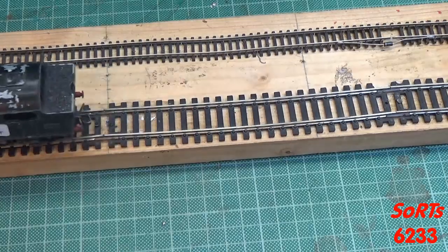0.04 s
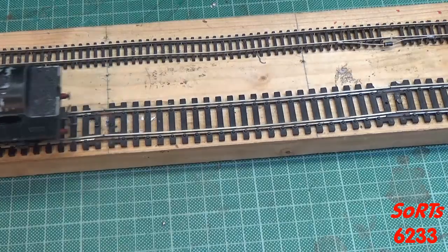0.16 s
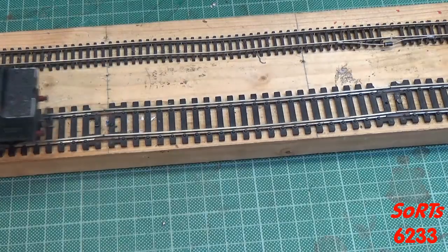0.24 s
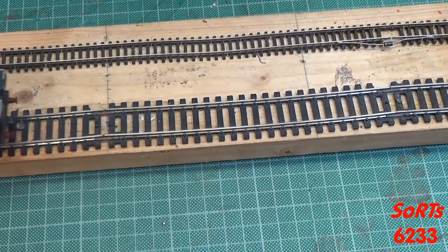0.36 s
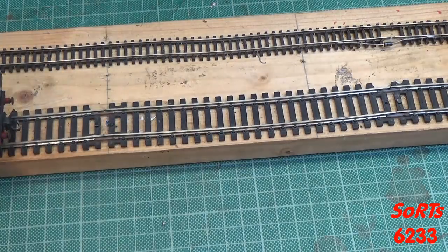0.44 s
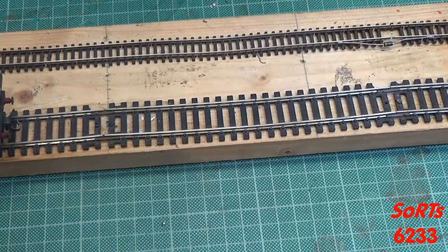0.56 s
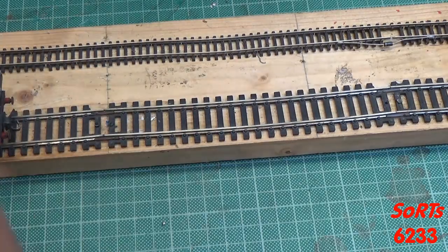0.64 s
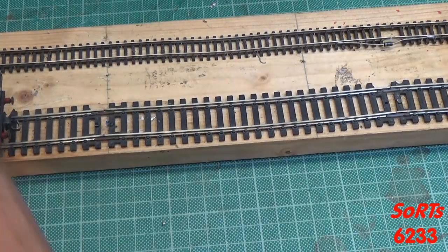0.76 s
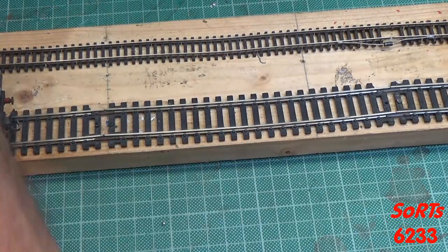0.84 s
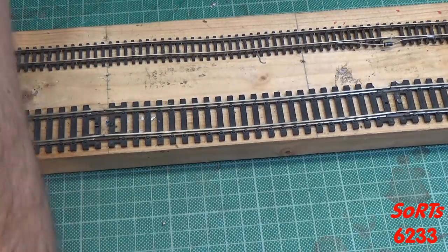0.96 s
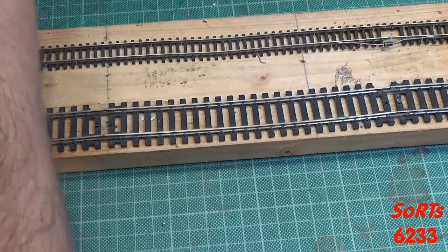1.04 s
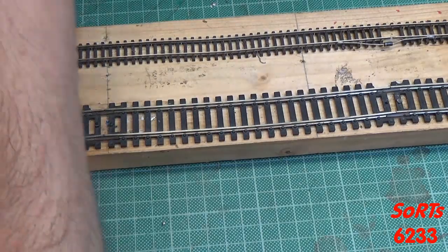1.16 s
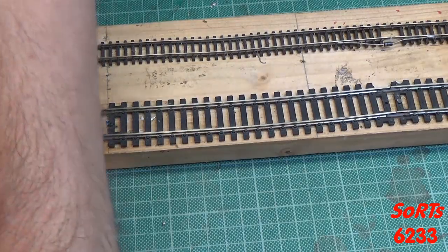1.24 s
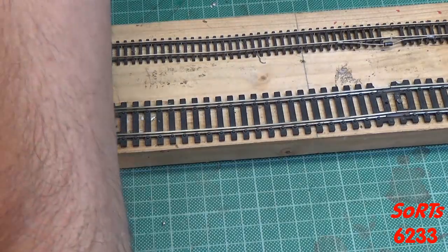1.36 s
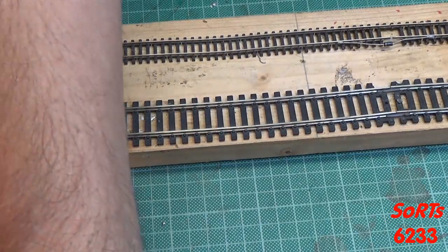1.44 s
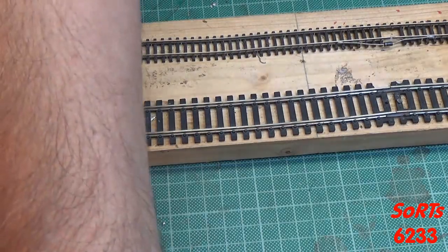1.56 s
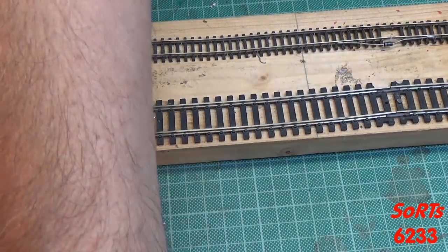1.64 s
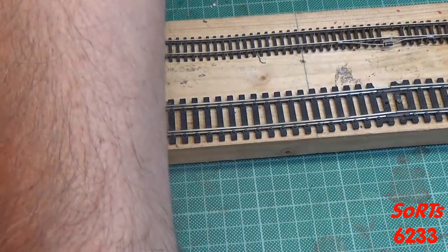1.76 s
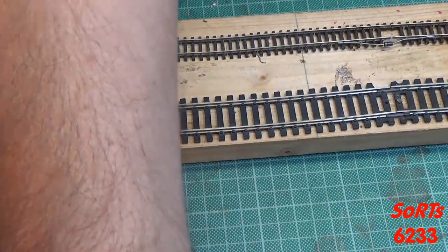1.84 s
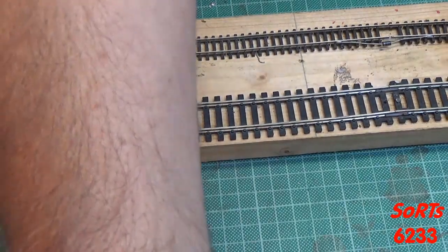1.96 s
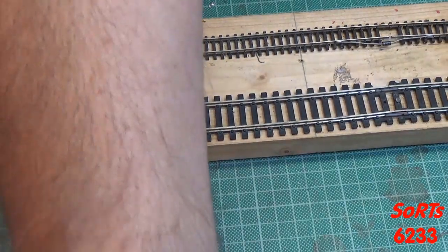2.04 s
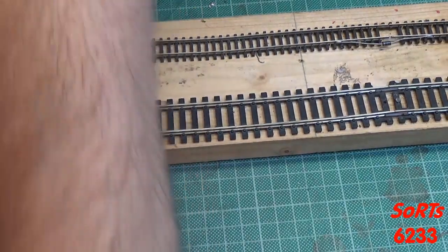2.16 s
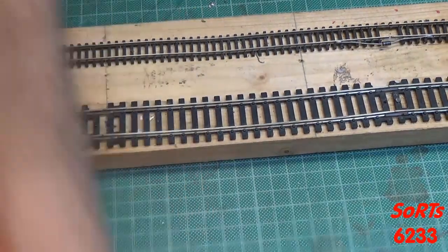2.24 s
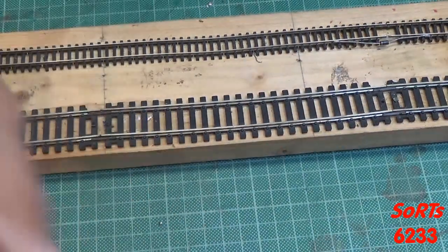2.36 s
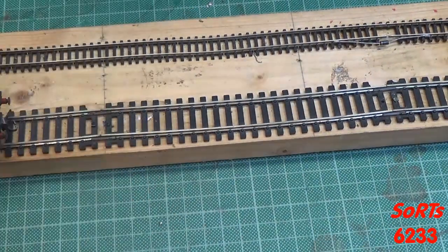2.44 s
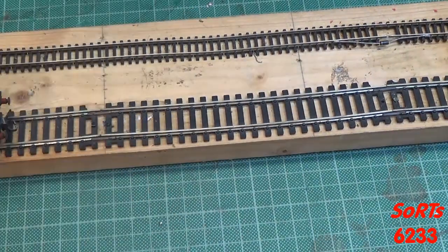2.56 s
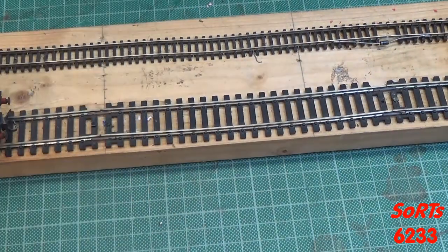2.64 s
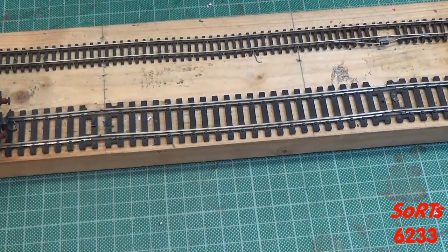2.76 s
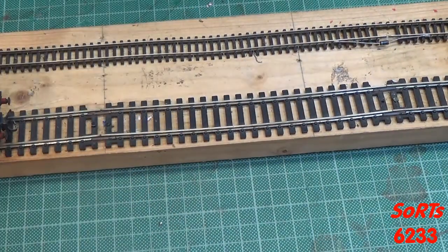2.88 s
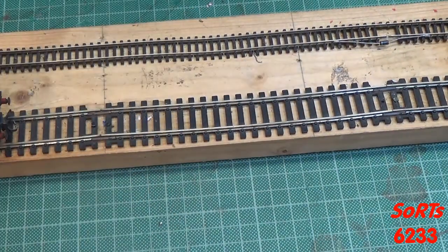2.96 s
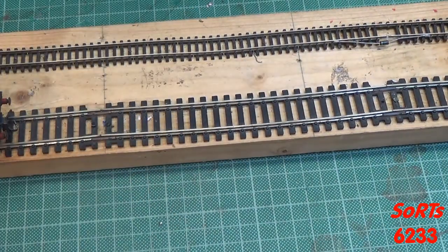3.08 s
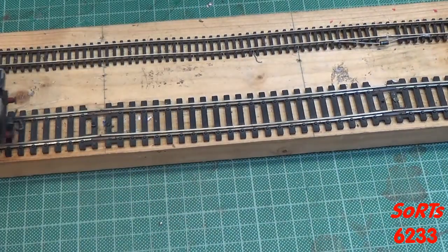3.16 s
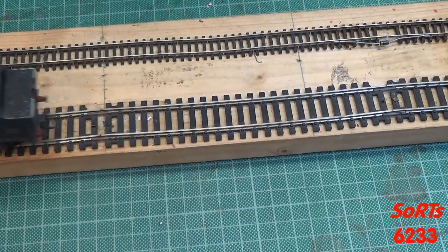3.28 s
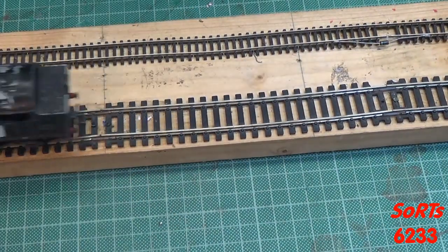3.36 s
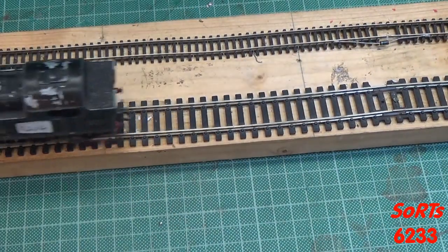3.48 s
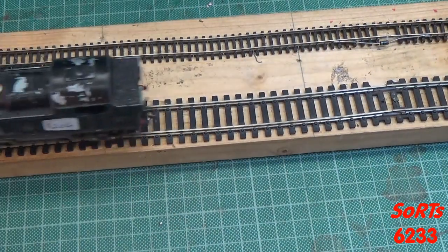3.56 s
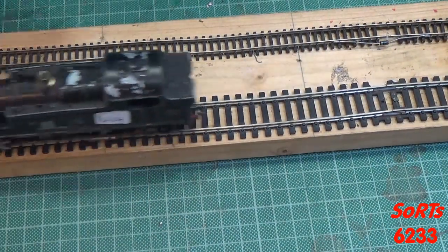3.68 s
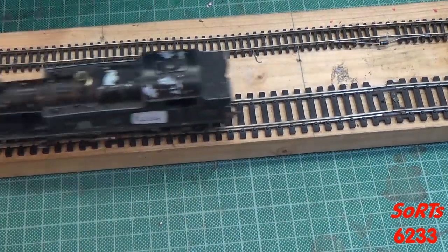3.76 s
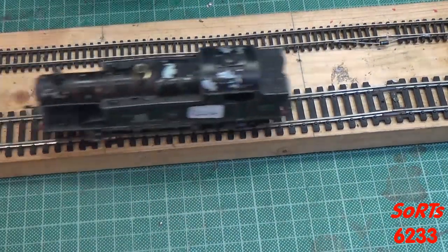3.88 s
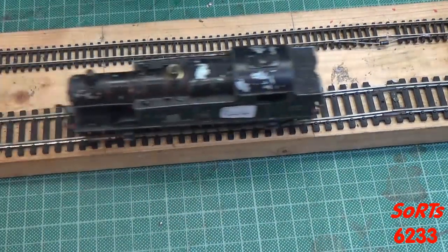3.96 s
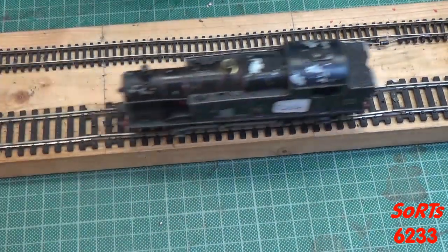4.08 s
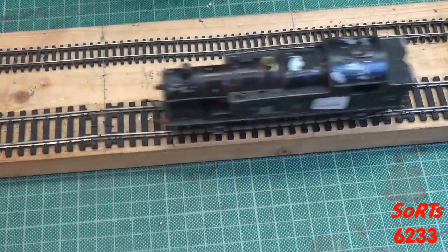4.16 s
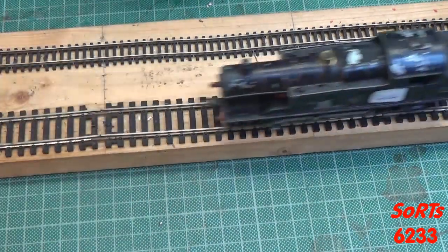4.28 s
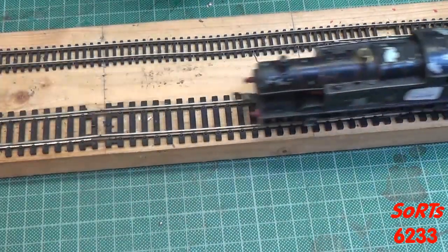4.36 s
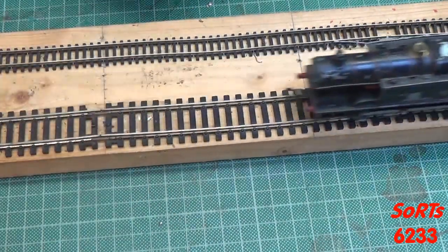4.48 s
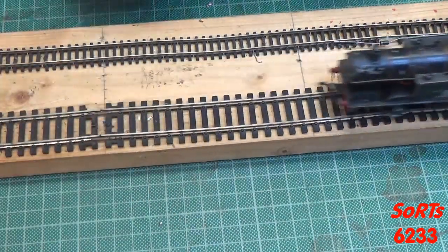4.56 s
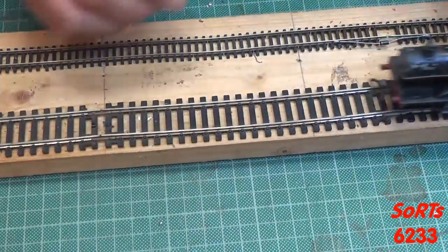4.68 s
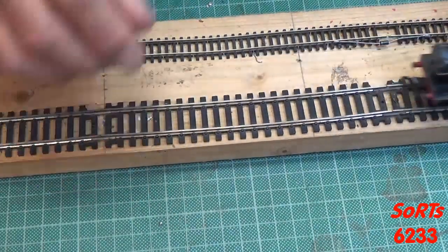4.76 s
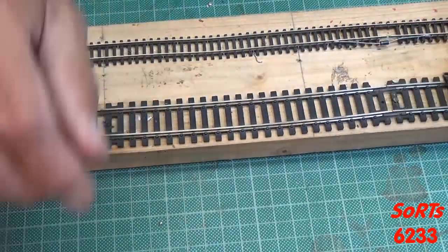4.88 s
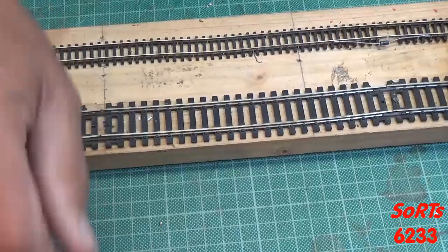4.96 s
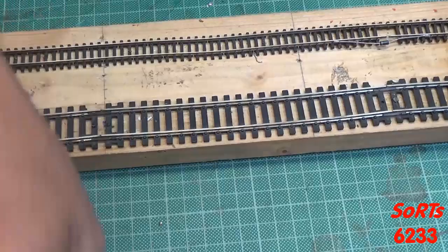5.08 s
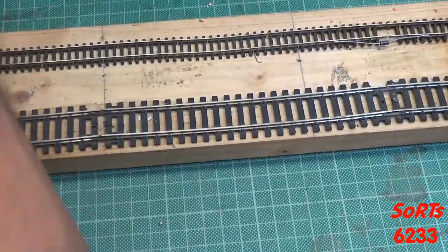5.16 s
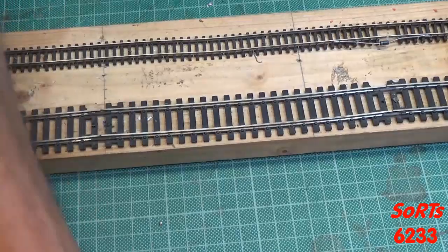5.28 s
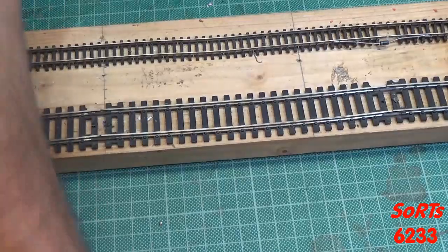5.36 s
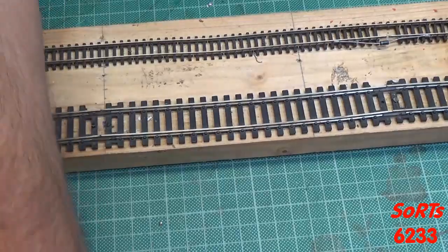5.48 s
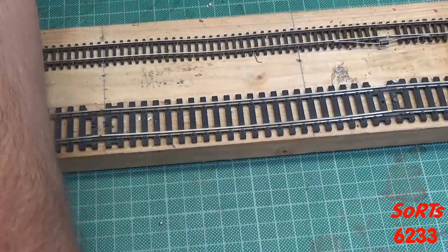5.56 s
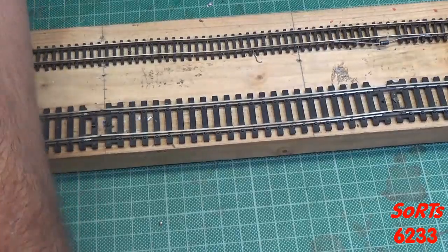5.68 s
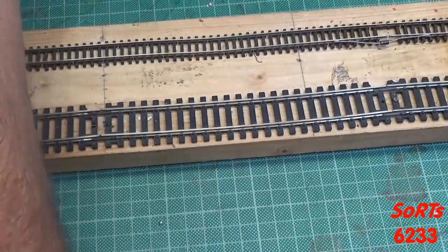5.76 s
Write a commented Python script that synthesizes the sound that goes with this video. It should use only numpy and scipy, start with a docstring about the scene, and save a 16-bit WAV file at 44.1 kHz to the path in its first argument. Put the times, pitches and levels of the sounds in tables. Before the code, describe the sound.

Soft bench knocks and clicks, then a toy locomotive's gritty gear whir with a thin whine, a pause with scraping bumps, and a short second run.

```python
"""In a small room, a model tank locomotive runs out along a wooden plank, stops and runs back near the microphone.
Random gear taps and loose metal excite the resonant body shell; shaped noise makes plank boom and wheel roll.
Wandering sine tones make the chassis sing and the gear mesh whine on the way out.
Noise bursts and damped modes make a direction switch before each run, and knocks and bumps on the bench.
Something scrapes on the bench, a faint high buzz pulses behind, and a falling band of noise swishes at the end."""
import sys
import numpy as np
from scipy import signal
from scipy.fft import rfft, irfft
from scipy.io import wavfile

SR = 44100
rng = np.random.default_rng(int(sys.argv[2]) if len(sys.argv) > 2 else 0)


def unload_wav(signal):
    """Save mono or channel-first audio to the path in sys.argv[1] as 16-bit WAV at rate SR, clipped to [-1, 1]."""
    wavfile.write(
        sys.argv[1],
        SR,
        np.round(np.clip(np.atleast_2d(signal).T, -1, 1) * 32767).astype(np.int16),
    )


N = 257103
T = np.arange(N) / SR
FREQ = np.maximum(np.fft.rfftfreq(2 * N, 1 / SR), 1)


def undb(db):
    """Decibels to gain."""
    return 10 ** (np.asarray(db) / 20)


def unit(x):
    """Scale to rms 1."""
    return x / np.sqrt(np.mean(x ** 2))


def curves(rows):
    """Each column of a timed table, interpolated per sample."""
    t_s, *columns = np.transpose(rows)
    return [np.interp(T, t_s, column) for column in columns]


def spectrum(points):
    """Level in dB at every frequency, straight lines on a log axis."""
    hz, db = np.transpose(points)
    return np.interp(np.log(FREQ), np.log(hz), db)


def colour(x, db):
    """Minimum-phase filter of the given dB shape and unit power gain: it rings after a blow, never before."""
    cepstrum = irfft(np.log(unit(undb(db))))
    cepstrum[1:N] *= 2
    cepstrum[N + 1:] = 0
    response = np.exp(rfft(cepstrum))
    return irfft(rfft(x, 2 * N) * response)[..., :N]


def noise():
    """White noise."""
    return rng.standard_normal(N)


def walk(cutoff_hz):
    """Smooth random motion of rms 1: low-passed noise."""
    lowpass = signal.butter(2, cutoff_hz, fs=SR, output="sos")
    return unit(signal.sosfilt(lowpass, noise()))


def band(x, hz, q):
    """One resonance, scaled to rms 1."""
    b, a = signal.iirpeak(min(hz, SR / 2 - 1), q, fs=SR)
    return unit(signal.lfilter(b, a, x))


def tone(hz, wander_hz, rate_hz):
    """Thin tone of rms 1 whose pitch wanders."""
    cycles = np.cumsum(hz + wander_hz * walk(rate_hz)) / SR
    return np.sqrt(2) * np.sin(2 * np.pi * cycles)


def swell(peak_s, rise_db_per_s, fall_db_per_s, hold_s=0):
    """Gain that rises to 1, holds and falls, straight in dB."""
    rise_db = rise_db_per_s * np.maximum(peak_s - T, 0)
    fall_db = fall_db_per_s * np.maximum(T - peak_s - hold_s, 0)
    return undb(-rise_db - fall_db)


def burst(start_s, db, contact_s):
    """Force of one rough contact: noise that builds quickly and dies away."""
    age = np.maximum(T - start_s, 0) / contact_s
    build = 1 - np.exp(-3 * age ** 2)
    force = noise() * build * np.exp(-np.minimum(age, 50))
    return undb(db) * force * np.sqrt(contact_s * SR / np.sum(force ** 2))


def ring(modes, blows, push_s):
    """Damped modes set off by (t/s, level/dB) blows; the push takes a moment to build."""
    out, t = np.zeros(N + SR), T[:SR // 2]
    rung = sum(undb(db - 60 * t / t60_s) * np.sin(2 * np.pi * hz * t) for hz, db, t60_s in modes)
    rung = rung * (1 - np.exp(-(t / push_s) ** 2))
    for start_s, db in blows:
        start = int(start_s * SR)
        out[start:start + len(t)] += undb(db) * rung
    return out[:N]


def scatter(per_s, scatter_db):
    """Touches at random moments, of random strength."""
    strength_db = scatter_db * np.clip(noise(), -2, 2)
    return (rng.random(N) < per_s / SR) * undb(strength_db)


def tinkle(hz, per_s, q, decay_s=0.0026, scatter_db=3):
    """Small loose parts touch at random moments and ring briefly near one pitch."""
    touches = scatter(per_s, scatter_db)
    fading = signal.lfilter([1], [1, -np.exp(-1 / (decay_s * SR))], touches)
    return band(noise() * fading, hz, q)


def room(x, wet_db, t60_s, side):
    """Dense early echoes from bench and walls, partly different at each ear."""
    t = T[:SR // 2]
    fade = undb(-60 * t / t60_s) * (t > .0015)
    fade = fade / np.linalg.norm(fade)
    mid, across = (signal.fftconvolve(x, rng.standard_normal(len(t)) * fade)[:N] for _ in range(2))
    # the microphone pair spreads the low middle most: f/Hz, level/dB
    spread = [(60, -3.0), (170, 6.0), (280, 12.5), (500, 23.0), (1000, 19.5), (3000, 15.5), (12000, 13.0)]
    across = colour(across, spectrum(spread))
    return x + undb(wet_db) * (mid + side * np.array([across, -across]))


# still-room spectrum: f/Hz, level/dB
AIR_COLOUR = [(15, -111), (25, -19), (70, -7.5), (114, -5), (145, -5), (326, -15.5), (405, -8.5), (476, -9),
              (516, -13.5), (734, -10.5), (818, -15), (1290, -12), (1480, -17.5), (2990, -19.5),
              (16000, -36.5)]
# room noise: t/s, level/dB
AIR_LEVEL = [(0, -49.5), (1.3, -50), (1.7, -52), (2.2, -52), (5.5, -46), (5.83, -47.5)]
# room noise, side re mid: f/Hz, level/dB
AIR_WIDTH = [(25, -5), (70, -43), (180, -18), (400, -13), (900, -9.5), (2000, -9), (4500, -8), (9000, -17)]


def air(hum_hz=100, hum_db=-57):
    """Room noise, coloured and spread by frequency, with a faint wavering mains hum."""
    mid, across = colour(np.array([noise(), noise()]), spectrum(AIR_COLOUR))
    across = irfft(rfft(across, 2 * N) * undb(spectrum(AIR_WIDTH)))[:N]
    hum = undb(hum_db + 2.3 * walk(0.34)) * np.sin(2 * np.pi * hum_hz * T)
    level = undb(curves(AIR_LEVEL)[0] + 0.12 * walk(0.53))
    return (mid + np.array([across, -across])) * level + hum


def faint_buzz(hz=3020, pulse_hz=25.2, start_db=-63.5, fade_db_per_s=3, deepest_fade_db=4):
    """A wandering high tone pulses evenly and recedes a little."""
    gate = (.5 + .5 * np.cos(2 * np.pi * pulse_hz * T)) ** 4
    level_db = start_db - np.minimum(fade_db_per_s * T, deepest_fade_db)
    return unit(tone(hz, wander_hz=60, rate_hz=137) * gate) * undb(level_db)


SWISH_S, SWISH_LENGTH_S, SWISH_DB = 5.62, .21, -53.5
SWISH_START_HZ, SWISH_FALL_OCTAVES_PER_S = 6500, 4.3


def swish(width_hz=330, rough_db=2, waver_hz=200):
    """Faint, uneven brushing hiss: narrow noise on a falling, wavering carrier."""
    age_s = np.clip(T - SWISH_S, 0, SWISH_LENGTH_S)
    hz = SWISH_START_HZ * 2 ** (-SWISH_FALL_OCTAVES_PER_S * age_s) + waver_hz * walk(117.5)
    arch = np.sqrt(np.abs(np.sin(np.pi * age_s / SWISH_LENGTH_S)))
    hiss = unit(walk(width_hz) * np.cos(2 * np.pi * np.cumsum(hz) / SR))
    return hiss * arch * undb(SWISH_DB + rough_db * walk(90))


# scrape: f/Hz, level/dB
SCRAPE_COLOUR = [(120, -10), (240, 4.5), (290, -7.5), (340, 2), (410, 7), (490, -4), (580, -7), (800, -13),
                 (1100, -14), (2500, -23), (8000, -37.5)]
SLIDE_PEAK_S, SLIDE_HOLD_S, SLIDE_DB = 4.965, 0.096, -25.5
SLIDE_RISE_DB_PER_S, SLIDE_FALL_DB_PER_S = 226, 430


def slide(side=0.51, grit_hz=1400, grit_db=-11):
    """Short juddering scrape on the bench with catches of grit, spread between the ears."""
    mid, across = colour(np.array([noise(), noise()]), spectrum(SCRAPE_COLOUR))
    grit = undb(grit_db) * tinkle(grit_hz, per_s=220, q=1.5, decay_s=0.00086)
    judder = undb(SLIDE_DB + 2 * walk(54))
    level = judder * swell(SLIDE_PEAK_S, SLIDE_RISE_DB_PER_S, SLIDE_FALL_DB_PER_S, SLIDE_HOLD_S)
    return (mid + grit + side * np.array([across, -across])) * level


# heavy bumps late in the scrape: t/s, level/dB
BUMP_BLOWS = [(5.0085, -8.5), (5.0135, -12), (5.051, -12.5), (5.06, -15)]
# f/Hz, level/dB, t60/s
BUMP_RING = [(395, -17, 0.04), (505, 5.5, 0.031), (636, -4, 0.03), (830, -7.5, 0.036), (1400, -13, 0.02)]


def bumps(left_over_right_db=3):
    """Heavy, hollow bumps on the left: damped modes, spread widely."""
    rung = ring(BUMP_RING, BUMP_BLOWS, push_s=0.0015)
    pan_db = np.array([[left_over_right_db], [-left_over_right_db]]) / 2
    return room(rung, wet_db=-6.0, t60_s=0.059, side=0.87) * undb(pan_db)


# bench-top thumps: t/s, level/dB
THUMP_BLOWS = [(1.351, -32), (1.373, -24), (1.438, -33)]
# f/Hz, level/dB, t60/s
THUMP_RING = [(89, -4.5, 0.17), (152, -5, .06)]


def thumps():
    """The bench top answers with short, deep damped modes."""
    return ring(THUMP_RING, THUMP_BLOWS, push_s=0.003)


# knocks on the bench: t/s, level/dB, contact/s, bench ring re knock/dB, bass edge f/Hz
BENCH_KNOCKS = [(.04, -46, 0.035, -44, 40), (.29, -48.5, 0.051, -43, 40), (0.475, -35, 0.013, -31, 110),
                (0.827, -38.5, 0.014, -17, 110), (1.0165, -28, 0.0061, -11.5, 323),
                (1.312, -36.5, 0.013, -26, 60), (1.3499, -14.5, 0.0023, -13, 50),
                (1.362, -25.5, 0.0044, -9, 60), (1.374, -28, 0.0042, 3.5, 199),
                (1.379, -28, 0.0034, -20, 900), (1.44, -42, 0.013, -30, 40),
                (4.873, -23, 0.004, -10.5, 500), (4.88, -36, .008, -24, 150),
                (4.9195, -26, 0.0032, -12, 130), (5.01, -19, 0.0026, -10, 550),
                (5.023, -23, 0.0031, -24, 300), (5.036, -23, 0.0017, -22, 250),
                (5.045, -24, 0.0023, -9, 704), (5.052, -23, 0.0023, -14, 248),
                (5.061, -33, 0.0024, -24, 400), (5.687, -38.5, 0.018, -39, 170)]
# knock, before dulling and bass loss: f/Hz, level/dB
BENCH_COLOUR = [(40, -22), (80, 4), (170, 7), (280, 5), (430, 0), (750, 0.5), (1500, -3.5), (2300, -10.5),
                (4000, 0), (8000, 0.5), (16000, 0)]
KNOCK_CYCLES = 6.9  # dull above this many cycles per contact time


def knocks():
    """Thuds on the bench: the longer the contact, the duller; each has its own bass edge."""
    out = np.zeros(N)
    for start_s, db, contact_s, _, low_hz in BENCH_KNOCKS:
        dull_db = 10 * np.log10(1 + (FREQ * contact_s / KNOCK_CYCLES) ** 4.9)
        thin_db = 10 * np.log10(1 + (low_hz / FREQ) ** 3)
        out += colour(burst(start_s, db, contact_s), spectrum(BENCH_COLOUR) - dull_db - thin_db)
    return out


# f/Hz, level/dB, t60/s
BENCH_RING = [(700.6, 9.5, 0.18), (757, 3.5, 0.097), (1230, -10, 0.08)]


def bench_ring(left_lag_s=0.00044):
    """The knocks leave a hollow ring, which reaches the right side first."""
    blows = [(start_s, db + ring_db) for start_s, db, _, ring_db, _ in BENCH_KNOCKS]
    rung = ring(BENCH_RING, blows, push_s=0.00095)
    return np.array([np.interp(T - left_lag_s, T, rung), rung])


# switch clicks: t/s, level/dB, contact/s, lever ring re click before snap_db/dB, seat ring re click/dB
SWITCH_CLICKS = [(.898, -22.5, 0.0044, 6, -11), (0.9265, -17, 0.0041, -30, -0.5),
                 (4.7778, -19.5, 0.0055, 3.5, -12), (4.8037, -16.5, 0.0055, -10, -1)]
# switch housing: f/Hz, level/dB
HOUSING_COLOUR = [(25, -40), (65, -4), (150, 2.5), (450, -4.5), (700, 2), (1100, -8.5), (1700, 0),
                  (2300, 1.5), (3000, -4.5), (4400, -0.5), (5500, -1), (7000, -4.5), (8700, -6.5),
                  (11000, -11), (16000, -11)]
# lever: f/Hz, level/dB, t60/s
LEVER_RING = [(3980, 0, .013), (4170, -12, .02), (4640, -5, .014), (5560, -15, .016), (6400, -10, .013),
              (8700, -16, .02)]
# seat: f/Hz, level/dB, t60/s
SEAT_RING = [(1774, 1.5, 0.03), (2160, -19, 0.014), (2930, 2, 0.017)]


def switch(snap_db=13):
    """The lever snaps loose with a very short ring, then clatters into its lower-ringing seat."""
    force = sum(burst(start_s, db, contact_s) for start_s, db, contact_s, _, _ in SWITCH_CLICKS)
    lever_blows = [(start_s, db + lever_db + snap_db) for start_s, db, _, lever_db, _ in SWITCH_CLICKS]
    seat_blows = [(start_s, db + seat_db) for start_s, db, _, _, seat_db in SWITCH_CLICKS]
    snap = ring(LEVER_RING, lever_blows, push_s=.0012)
    seat = ring(SEAT_RING, seat_blows, push_s=.002)
    return colour(force, spectrum(HOUSING_COLOUR)) + snap + seat


# locomotive: t/s, place along track (0 near end, 1 far end)
LOCO_PLACE = [(2.2, 0.012), (3.4, 0), (4.1, 0.72), (4.8, 1), (5.4, 0.39)]


def track_place():
    """Place of the locomotive along the track, 0 to 1."""
    return np.clip(curves(LOCO_PLACE)[0], 0, 1)


# body shell, broad colour: f/Hz, level/dB
SHELL_COLOUR = [(300, -16), (800, -7), (1100, -4.5), (1500, 0), (2200, 0), (2900, 2.5), (4500, 2.5),
                (6000, -3.5), (7600, -4.5), (8600, -18.5), (12000, -12), (15500, -17.5)]
# body shell resonances: f/Hz, width/Hz, lift at near end/dB, lift at far end/dB
SHELL_PEAKS = [(1450, 610, 1.1, 8.3), (1856, 160, 6.8, 6.3), (2026, 203, 12.2, 0.7), (2149, 120, 6.1, 4.9),
               (2353, 116, 10.4, 6.67), (2443, 242, 1.2, 14.8), (3570, 150, 3.1, 0.84), (3823, 220, 7.3, 3),
               (4220, 81, 5.4, 1.3), (4930, 150, 2, 0.8), (5600, 53, 1.8, 0.9), (7120, 780, 2.4, 6.3),
               (9600, 1100, 9.5, 4.8)]


def shell(force):
    """The body shell radiates; its resonances weigh differently along the track."""
    place = track_place()
    near_db = far_db = spectrum(SHELL_COLOUR)
    for hz, width_hz, near_lift_db, far_lift_db in SHELL_PEAKS:
        peak = 1 / (1 + (2 * (FREQ - hz) / width_hz) ** 2)
        near_db = near_db + near_lift_db * peak
        far_db = far_db + far_lift_db * peak
    return (1 - place) * colour(force, near_db) + place * colour(force, far_db)


def shell_waver(x, waver_db=2.6, waver_hz=9):
    """The shell shifts on its frame, so each resonance swells and fades on its own."""
    out = x
    for hz, width_hz, _, _ in SHELL_PEAKS:
        edges_hz = [hz - width_hz / 2, hz + width_hz / 2]
        bandpass = signal.butter(1, edges_hz, "band", fs=SR, output="sos")
        part = signal.sosfiltfilt(bandpass, x)
        out = out + part * (undb(waver_db * walk(waver_hz)) - 1)
    return out


def shell_rattle(per_s=38, hz=2130, q=7, near_db=-8):
    """The loose shell bumps on its frame at uneven moments and rings near its main resonance."""
    rattle = tinkle(hz, per_s, q, decay_s=0.0018, scatter_db=2)
    return band(rattle, hz, q=15.0) * undb(near_db) * (1 - .5 * track_place())


# wheels jolting on the rails: t/s, level/dB, contact/s, shell ring re jolt/dB
RAIL_JOLTS = [(2.159, -45, 0.0023, 1.5), (2.212, -31.5, 0.0078, -14), (2.408, -31, 0.0034, -8),
              (2.5566, -30, .003, 15), (2.9378, -25.5, 0.0045, 0), (3.137, -21.5, 0.0064, 0),
              (3.155, -23, 0.0037, -4), (3.2163, -22.5, 0.0019, 10), (3.231, -26, 0.0027, 6),
              (3.314, -22.5, 0.0038, 6), (3.484, -24, 0.0032, 7), (3.8828, -26, 0.0029, 8),
              (3.918, -29, 0.0043, 11), (4.0133, -37, 0.0013, 0), (4.281, -17.5, 0.0014, -17),
              (4.399, -24, 0.002, -8), (4.6432, -34, 0.0018, -6), (4.707, -25, 0.0022, 4),
              (5.029, -23, 0.004, -12), (5.036, -21, 0.0045, -6), (5.046, -27, 0.0032, 3),
              (5.085, -24, 0.004, -6), (5.103, -27, .003, -3), (5.129, -23, 0.005, -8),
              (5.168, -26.5, 0.0054, -3), (5.223, -21, 0.0039, 5), (5.24, -19, 0.0034, 2),
              (5.274, -21.5, 0.0027, 9.5), (5.311, -21, 0.0038, -2), (5.381, -29, 0.0028, 8)]
# shell after a jolt: f/Hz, level/dB, t60/s
JOLT_RING = [(2023, -5.5, 0.023), (2095, -4, 0.029), (3780, -11, .015)]


def jolts():
    """Single harder blows of the wheels on the rails, each with its share of shell ring."""
    force = sum(burst(start_s, db, contact_s) for start_s, db, contact_s, _ in RAIL_JOLTS)
    blows = [(start_s, db + ring_db) for start_s, db, _, ring_db in RAIL_JOLTS]
    return shell(force) + ring(JOLT_RING, blows, push_s=.001)


# sharp ticks, mostly running gear: t/s, level/dB, contact/s, f/Hz
SHARP_TICKS = [(1.354, -33, 0.0014, 7900), (1.362, -40, .0013, 7000), (1.375, -40, 0.0012, 7000),
               (1.387, -46, 0.0012, 5500), (1.4, -44, .001, 5500), (1.926, -47.5, .001, 9250),
               (2.334, -30.5, 0.0045, 5700), (2.405, -31, 0.0045, 3720), (3.039, -28, 0.0021, 10200),
               (3.137, -30, 0.0048, 9800), (3.242, -27.5, .003, 6500), (3.333, -26, .0015, 7200),
               (3.363, -35, 0.0027, 9000), (3.443, -36, .004, 9000), (3.582, -28, 0.0033, 11400),
               (3.63, -25.5, 0.0033, 9500), (3.746, -27, 0.0036, 8190), (3.776, -30.5, 0.0035, 9100),
               (3.897, -33, 0.0037, 12010), (4.113, -32.5, 0.0033, 9940), (4.135, -27.5, 0.0026, 8200),
               (4.158, -36, 0.0025, 13500), (4.282, -26.5, 0.0029, 7100), (4.399, -39, 0.0017, 13960),
               (4.424, -39, 0.0019, 15000), (4.703, -33.5, 0.0032, 9350), (4.935, -37, .0015, 4300),
               (4.973, -30, 0.0032, 4200), (5.028, -22.5, 0.0022, 7050), (5.13, -20.5, 0.00084, 7250),
               (5.239, -17, 0.002, 6500), (5.425, -30.5, 0.0025, 9500), (5.743, -36, 0.0022, 2740)]


def ticks(q=3.3):
    """Bright single ticks: noise bursts through one broad resonance each."""
    out = np.zeros(N)
    for start_s, db, contact_s, hz in SHARP_TICKS:
        force = burst(start_s, db, contact_s)
        out += band(force, hz, q) * np.std(force)
    return out


# plank boom: f/Hz, level/dB
PLANK_COLOUR = [(35, -31), (55, -27), (75, -8.5), (105, -14), (130, -5.5), (150, -4.5), (163, 0.5),
                (185, -2.5), (225, -11), (290, -22.5), (500, -56)]
# heavy lurches: t/s, load/dB, f/Hz, half length/s
PLANK_LURCHES = [(2.294, -30.5, 149.5, 0.013), (2.528, -31, 167.3, 0.015), (2.669, -28.5, 171.6, 0.01),
                 (2.762, -25.5, 160, .02), (2.85, -34.5, 140.3, 0.018), (2.978, -23.5, 163.2, 0.023),
                 (3.113, -29.5, 174.3, 0.01), (3.19, -25, 170.6, 0.015), (3.96, -26, 160.5, .018),
                 (4.149, -22.5, 162.8, .023), (4.384, -25.5, 177, 0.017), (4.592, -31.5, 150, 0.017),
                 (4.689, -33.5, 215.7, 0.012), (5.034, -25.5, 165, 0.02), (5.1, -28, 167.1, 0.013),
                 (5.202, -26, 171.6, .017), (5.293, -24.5, 166.6, 0.016)]


def lurches(rough_db=-9, boom_db=-2):
    """The locomotive rocks on the plank, which booms at a pitch that glides from lurch to lurch."""
    load = sum(undb(db) * np.exp(-.5 * ((T - peak_s) / half_s) ** 2)
               for peak_s, db, _, half_s in PLANK_LURCHES)
    hz = curves(PLANK_LURCHES)[1]
    boom = tone(hz, wander_hz=8.83, rate_hz=32.6) * load * undb(boom_db)
    return boom + undb(rough_db) * colour(noise() * load, spectrum(PLANK_COLOUR))


# the two runs: power on/s, power off/s, treble/dB, plank boom/dB, wheel roll/dB
LOCO_RUNS = [(2.209, 4.715, -9, -34.5, -46), (4.951, 5.44, -10, -36, -44.5)]
# thin chassis tone: t/s, level/dB
SING_LEVEL = [(2.25, -57), (2.7, -44.5), (2.92, -49), (3.03, -37.5), (3.16, -34), (3.26, -47.5),
              (3.35, -39.5), (3.48, -38), (3.56, -43), (3.8, -42), (4.0, -49), (4.7, -55)]
# gear-mesh whine: t/s, f/Hz, level/dB
MESH_WHINE = [(2.22, 2060, -53), (2.32, 2078, -41), (2.7, 2130, -39), (3.05, 2166, -53), (3.18, 2147, -35),
              (3.42, 2144, -40.5), (3.65, 2150, -43), (3.8, 2164, -34), (3.93, 2200, -37),
              (4.05, 2129, -51)]
# octave of the whine: t/s, level/dB
OCTAVE_LEVEL = [(2.3, -50), (2.8, -59), (2.95, -42), (3.08, -42), (3.28, -38), (3.42, -45), (3.57, -41),
                (3.8, -50), (4.05, -56)]


def chassis(sing_hz=1219, skirt_hz=1260, skirt_db=-6, sing_flutter_db=1.0, rough_db=3):
    """On the way out the chassis sings a thin, fluttering tone; the gear mesh whines with its octave."""
    thin = unit(tone(sing_hz, wander_hz=9, rate_hz=45) * undb(sing_flutter_db * walk(45)))
    skirt = band(band(noise(), skirt_hz, q=11), skirt_hz, q=11)
    sing = (thin + undb(skirt_db) * skirt) * undb(curves(SING_LEVEL)[0])
    hz, db = curves(MESH_WHINE)
    mesh = tone(hz, wander_hz=15.0, rate_hz=52) * undb(db + rough_db * walk(40))
    octave_db = curves(OCTAVE_LEVEL)[0] + rough_db * walk(40)
    octave = tone(2 * hz, wander_hz=26, rate_hz=38.6) * undb(octave_db)
    on_s, off_s = LOCO_RUNS[0][:2]
    return (sing + mesh + octave) * (T > on_s) * (T < off_s)


def clinks(low_hz=3000, high_hz=4900, t60_s=0.016, level_db=-12, spread_db=6, count=1000):
    """Loose links and wheel flanges clink at random, each a short ring at its own pitch."""
    out, t = np.zeros(N + SR), T[:SR // 10]
    for when, pitch, size in rng.random((count, 3)):
        start = int(when * N)
        hz = low_hz * (high_hz / low_hz) ** pitch
        decay = np.exp(-np.log(1000) * t / t60_s)
        out[start:start + len(t)] += np.sin(2 * np.pi * hz * t) * undb(spread_db * size) * decay
    return unit(out[:N]) * undb(level_db)


def gear_force(motor_hz=66.1, taps_per_s=1700, throb_db=0.5, flutter_db=1.67, brush_db=-5,
               teeth=6, tooth_db=2, scatter_db=3):
    """Loose teeth tap at random, harder once a motor turn and at each tooth; brushes rub throughout."""
    turn = 2 * np.pi * np.cumsum(motor_hz * (1 + 0.04 * walk(4.19))) / SR
    taps = scatter(taps_per_s, scatter_db)
    contact_db = throb_db * np.sin(turn) + tooth_db * np.sin(teeth * turn) + flutter_db * walk(49)
    rubbing = undb(brush_db) * noise()
    return unit((unit(taps - taps.mean()) + rubbing) * undb(contact_db))


# wheel roll: f/Hz, level/dB
ROLL_COLOUR = [(200, -14), (310, -5), (400, 2.5), (490, -3.5), (580, -2.5), (680, -1), (830, -5.5),
               (980, -14.5), (1500, -29.5)]
# gear drive out, before chatter_db: t/s, level/dB
GEAR_OUT = [(2.215, -38), (2.3, -32), (2.45, -28.5), (2.6, -32), (2.72, -28.0), (2.95, -27.5),
            (3.07, -29.5), (3.14, -26.5), (3.55, -26), (3.67, -28), (3.78, -26.5), (3.92, -27.5),
            (4.05, -30), (4.33, -29), (4.45, -34.5), (4.58, -25), (4.71, -31.5)]
# gear drive back, before chatter_db: t/s, level/dB
GEAR_BACK = [(4.955, -38), (5.0, -40), (5.04, -28), (5.118, -33.5), (5.142, -24), (5.158, -35.5),
             (5.174, -23), (5.196, -30.5), (5.232, -20), (5.256, -27.5), (5.276, -24), (5.3, -30),
             (5.32, -25), (5.378, -27.5), (5.405, -34.5), (5.43, -37.5), (5.46, -48)]
# the driving wheels bind once a turn
WHEEL_HZ, TIGHT_SPOT_S, WHEEL_SWING_DB = 5.28, 3.19, 0.5
# dB per dB of gear drive above usual
USUAL_DB, TREBLE_FOLLOW, BOOM_FOLLOW, ROLL_FOLLOW = -26.5, 0.61, 0.12, 0.45
# change from near end to far end
FAR_TREBLE_DB, FAR_BOOM_DB, FAR_ROLL_DB = -4, 0.5, 11
# track fraction where the gears pass the microphone, and over what stretch
PASS_PLACE, PASS_WIDTH = 0.63, 0.073
FLICKER_DB = 2.2  # unevenness of the top octave, rms
PICKUP_HZ = (5870, 6450, 8640, 9500, 11000, 13000, 13800)


def run(drive, on_s, off_s, treble_db, boom_db, roll_db, chatter_db=-1.67, bright_db=11, tinkle_db=-4,
        rods_db=-14, uneven_db=0.2, start_s=0.03, stop_s=0.035, boom_build_s=0.11):
    """One run: gears chatter in the shell, pick-ups and rods tinkle, wheels boom and roll on the plank."""
    place = track_place()
    power = np.interp(T, [on_s, on_s + start_s, off_s, off_s + stop_s], [0, 1, 1, 0])
    binding_db = WHEEL_SWING_DB * np.cos(2 * np.pi * WHEEL_HZ * (T - TIGHT_SPOT_S))
    gear_db = curves(drive)[0] + binding_db + uneven_db * walk(60)
    effort_db = gear_db - USUAL_DB
    # the top octave drops once the gears have passed the microphone
    shade = .5 + .5 * np.tanh((place - PASS_PLACE) / PASS_WIDTH)
    top_db = treble_db + TREBLE_FOLLOW * effort_db + FAR_TREBLE_DB * shade + FLICKER_DB * walk(31)
    chatter = shell_waver(shell(gear_force()))
    highpass = signal.butter(2, 7000, "high", fs=SR, output="sos")
    fizz = signal.sosfiltfilt(highpass, chatter)
    # metal contacts, each at its own pitch
    pickups = unit(sum(tinkle(hz, per_s=150, q=10) / hz ** .5 for hz in PICKUP_HZ))
    top = undb(top_db) * (fizz * undb(bright_db) + pickups * undb(tinkle_db))
    # the coupling rods clink more plainly towards the far end
    rods = tinkle(7350, per_s=70, q=36) * undb(rods_db) * place
    metal = chatter - fizz + top + rods + clinks() + shell_rattle()
    # the plank takes a moment to get going
    build = 1 - np.exp(-np.maximum(T - on_s, 0) / boom_build_s)
    plank_db = boom_db + BOOM_FOLLOW * effort_db + FAR_BOOM_DB * place
    plank = build * colour(noise(), spectrum(PLANK_COLOUR)) * undb(plank_db)
    wheels_db = roll_db + ROLL_FOLLOW * effort_db + FAR_ROLL_DB * place
    wheels = colour(gear_force(), spectrum(ROLL_COLOUR)) * undb(wheels_db)
    return power * (metal * undb(gear_db + chatter_db) + plank + wheels)


def scene(near_pan_db=-0.2, far_pan_db=-1.4):
    """Locomotive, switch and bench in the room; the locomotive pans further right towards the far end."""
    pan_db = near_pan_db + (far_pan_db - near_pan_db) * curves(LOCO_PLACE)[0]
    background = air() + faint_buzz() + swish()
    thuds = room(knocks(), wet_db=-5.5, t60_s=0.092, side=0.48)
    bench = slide() + bumps() + thumps() + thuds + bench_ring()
    clicks = room(switch(), wet_db=-7.0, t60_s=0.14, side=0.54)
    runs = run(GEAR_OUT, *LOCO_RUNS[0]) + run(GEAR_BACK, *LOCO_RUNS[1])
    loco = runs + lurches() + chassis() + jolts() + ticks()
    loco = room(loco, wet_db=-10, t60_s=.11, side=.58) * undb(np.array([pan_db, -pan_db]) / 2)
    return background + bench + clicks + loco


def record(dry, top_hz=16000):
    """The recorder cuts the top with a steep low-pass."""
    return signal.sosfilt(signal.ellip(10, .2, 80, top_hz, fs=SR, output="sos"), dry)


dry = scene()
out = record(dry)
unload_wav(out)
```